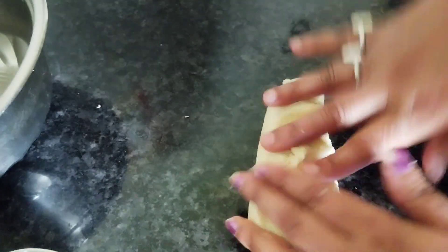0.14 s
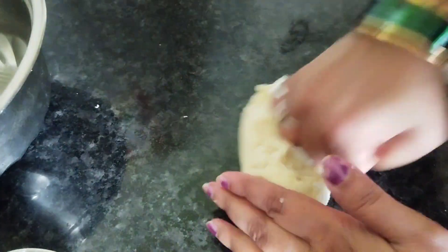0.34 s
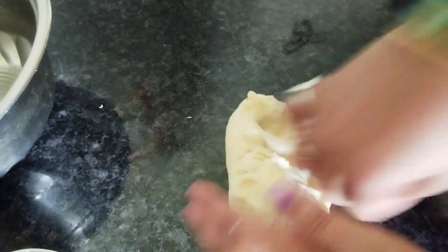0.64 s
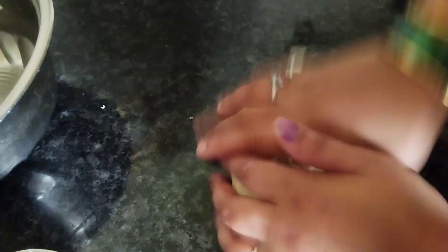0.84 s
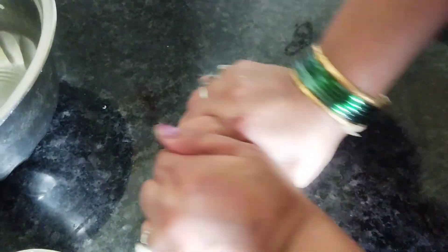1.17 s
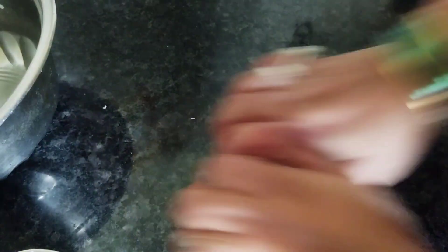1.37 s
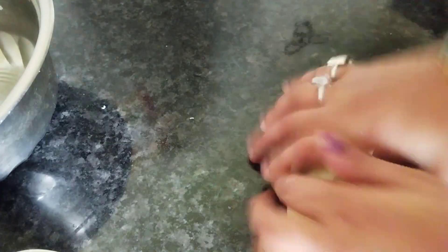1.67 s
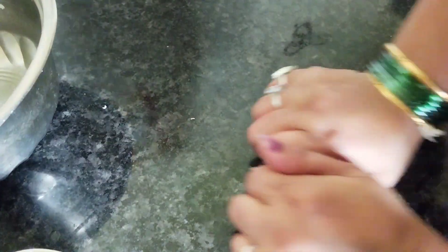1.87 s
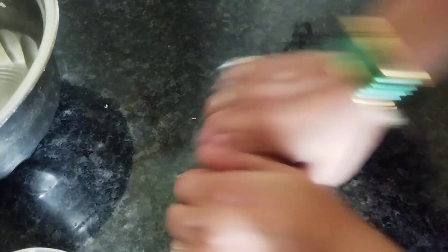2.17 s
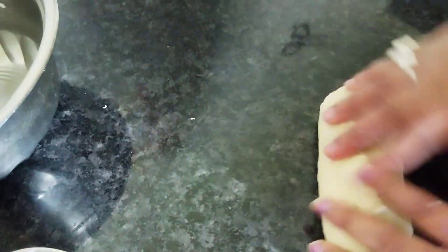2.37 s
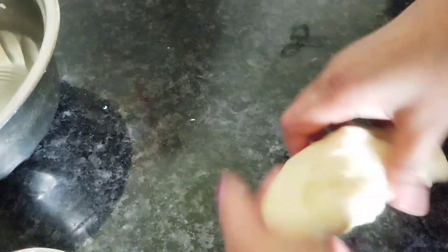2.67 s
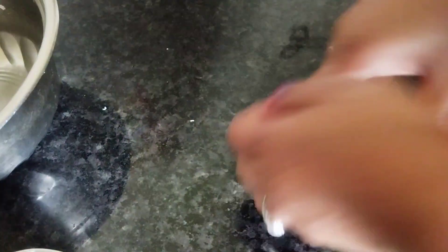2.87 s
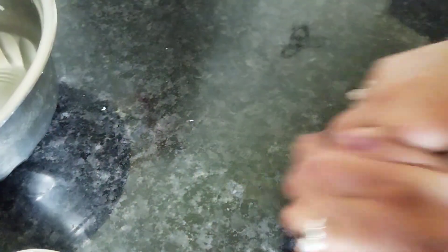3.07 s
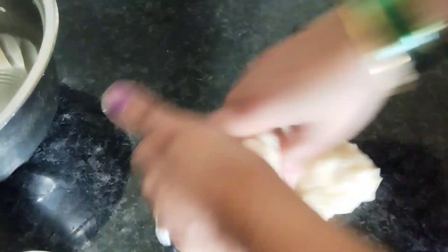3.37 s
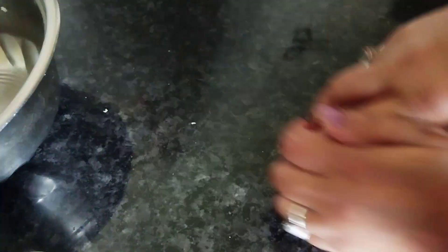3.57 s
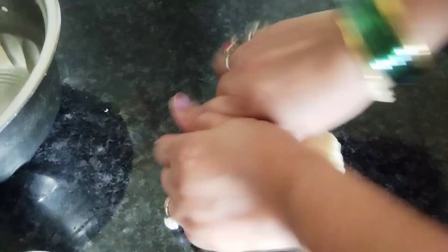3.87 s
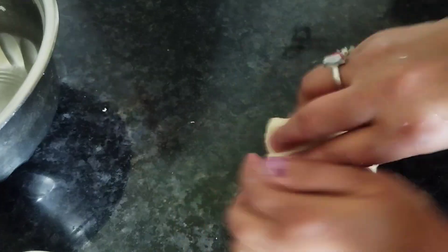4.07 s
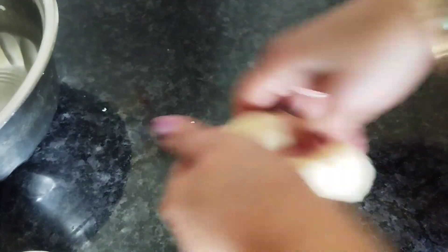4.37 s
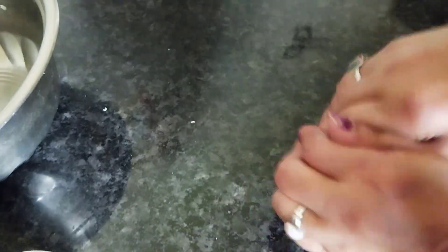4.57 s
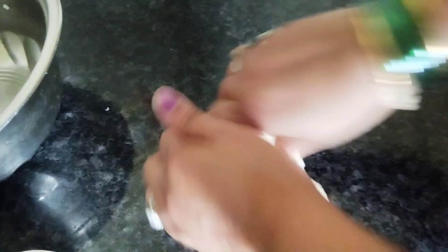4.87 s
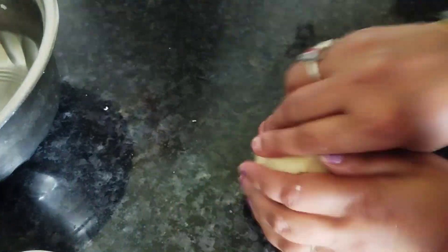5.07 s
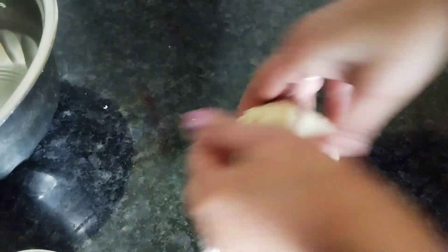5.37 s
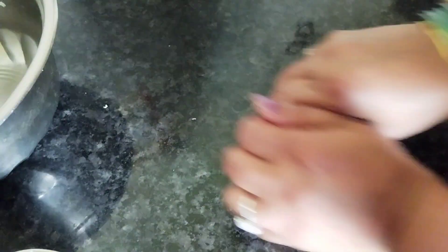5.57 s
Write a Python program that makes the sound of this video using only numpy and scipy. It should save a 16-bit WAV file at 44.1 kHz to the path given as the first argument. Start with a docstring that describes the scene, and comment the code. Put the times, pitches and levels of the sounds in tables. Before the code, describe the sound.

Thin glass bangles clink on a wrist while two hands knead stiff dough on a stone counter, heard from close by in a small kitchen. A sharp clink comes right at the start and another at about 0.7 seconds, with lighter ticks between. The thickest flurry arrives around 1.3 seconds, followed by a smaller cluster near 2.1 seconds and further sharp clinks at about 2.9 and 4.1 seconds. After that the clinks are mostly light, with one brighter click near 5.6 seconds. Each is a high, dry, quickly damped chatter of glass on glass, followed by a softer touch and a short reflection from hard walls. Underneath, the dough gives quiet rubs and dull thuds that swell and ease about twice a second, along with faint ticks of sliding bangles. A low appliance hum and a soft steady hiss run throughout.

```python
"""A small kitchen, one microphone close to two hands kneading stiff dough on a stone counter.
From the start a low appliance hum and microphone hiss lie under the rub and thud of the strokes.
With the first push, thin glass bangles clink on a wrist: a chatter of ring against ring, a dry crack
and high modes that the skin soon damps. A softer touch follows each clink, and hard walls answer.
The thickest flurry comes near 1.3 s; after about 4 s the clinks are mostly light."""
import sys
import numpy as np
from scipy import signal
from scipy.fft import rfft, irfft
from scipy.io import wavfile

SR = 44100
rng = np.random.default_rng(int(sys.argv[2]) if len(sys.argv) > 2 else 0)


def wrap_up_sound(samples):
    """Save the sound to the file named by the first command line argument, as 16-bit audio."""
    columns = np.atleast_2d(samples).T
    # keep every value between -1 and 1, then stretch to whole-number steps
    tamed = np.clip(columns, -1, 1)
    steps = np.round(tamed * 32767).astype(np.int16)
    wavfile.write(sys.argv[1], SR, steps)


N = 252714

# bangle clinks: (time [s], crack level over 10 ms [dB], chatter length [s], treble tilt [dB],
# pitch of the struck bangle [Hz], its ring over the crack [dB], low modes over the crack [dB])
CLINKS = [(0.0164, -18, 0.0086, 4.5, 7970, 3, -29), (0.2236, -39, 0.007, -5, 7940, 2.5, -27),
          (0.2495, -42.5, .004, 4, 8070, 8, -38), (0.3094, -29.5, 0.02, 4, 7860, -4, -27),
          (.358, -34.5, .013, 5, 7720, 1, -32), (.4183, -35.5, .008, 0, 7800, -2, -32),
          (0.4463, -32, 0.0079, -6, 7860, -3, -31), (0.6386, -29.5, 0.015, 2, 8350, -13, -32),
          (0.7145, -12.5, 0.0074, 3, 7724, -.5, -36), (.686, -41, 0.0035, -9, 7620, -7, -40),
          (0.905, -36, 0.0036, 4, 8070, -2, -36), (0.965, -31.5, 0.0066, -23, 7660, -3, -36),
          (1.089, -34.5, 0.0053, 3, 8100, -10, -36), (1.111, -27.5, 0.0027, -2, 7400, -7.5, -43),
          (1.244, -16, 0.01, 2, 7760, -8, -30), (1.2681, -15.5, 0.0045, 3, 8400, -9, -41),
          (1.277, -19.5, .009, 2, 8900, -8, -15), (1.29, -16, 0.0054, -2, 7880, -8, -5),
          (1.2991, -24.5, 0.0049, -12, 7670, 8, -29), (1.3073, -18, .01, 10, 7930, -3, -31),
          (1.375, -24.5, 0.0061, -1, 8690, -8, -30), (1.632, -33.5, 0.011, -15, 8440, -4, -22),
          (1.7233, -36, 0.0099, -8, 9150, -4, -21), (1.74, -35, 0.0059, -5, 8070, 5.5, -36),
          (1.826, -43, .0045, 7, 8640, 4, -19), (1.9799, -32, 0.011, -3, 7000, -2, -36),
          (2.005, -29.5, .022, 0, 7530, -4, -27), (2.0645, -14, 0.0093, 3.5, 9000, -11, -37),
          (2.1161, -21.5, 0.011, 9, 7850, -7, -27), (2.1388, -21, .005, .5, 7800, -2, -17.5),
          (2.4877, -34, 0.014, -4, 7840, 0, -36), (2.566, -31, 0.021, 3, 8400, -15, -37),
          (2.671, -42, .012, -3, 8400, -5, -35), (2.781, -28.5, 0.007, 0, 7640, -8, -43),
          (2.8741, -15, 0.0099, 1.5, 9900, -15, -16), (3.1125, -38.5, 0.0047, 0, 9060, -1, -18),
          (3.3483, -35.5, 0.0063, 1, 7700, -7, -27), (3.4533, -28.5, .003, -1, 8160, 6.5, -39),
          (3.529, -27.5, 0.0048, -4.5, 8720, -5, -17), (3.6549, -33.5, 0.0097, -2, 7740, -18, -30),
          (3.868, -32.5, 0.0018, -1, 7900, -12, -43), (3.9156, -29.5, .007, 4, 8100, 1.5, -44),
          (3.9413, -42, .002, 7, 7900, 10, -36), (3.994, -35, 0.0058, -10, 6830, -8, -23),
          (4.0619, -23, 0.01, -3, 7990, -10, -19.5), (4.067, -20, 0.0062, 9, 8170, 3, -47),
          (4.3987, -42.5, .006, 0, 8900, -1, -18), (4.534, -35.5, 0.0073, -3.5, 8020, 8, -42),
          (4.6265, -31, .004, 4, 7610, 1.5, -42), (4.9158, -33, .0033, 1, 7700, 7, -36),
          (5.04, -40.5, 0.0054, -9, 7950, 7, -26), (5.107, -35.5, 0.007, -6, 7320, -4, -19),
          (5.135, -37.5, 0.023, -8, 7050, -4, -36), (5.515, -36, 0.0045, -8, 7890, 11.5, -34),
          (5.57, -49, 0.0026, 0, 7770, 11.5, -46), (5.602, -34.5, 0.0064, -7, 8500, -14, -38),
          (5.6092, -22.5, 0.0058, 5.5, 8240, -20, -44)]


def amp(db):
    """Decibels to gain."""
    return 10 ** (np.asarray(db) / 20)


def unit(x):
    """Scales to an energy of one."""
    return x / np.sqrt(np.sum(x ** 2) + 1e-20)


def curve(points, hz):
    """Joins (frequency [Hz], value) points by straight lines on a log frequency axis."""
    f, value = np.transpose(points)
    return np.interp(np.log(hz + 1), np.log(f + 1), value)


def add(mix, s, sound):
    """Lays a sound into the mix at s seconds."""
    part = mix[max(round(s * SR), 0):][:len(sound)]
    part += sound[:len(part)]


def noise(gain):
    """Noise of rms one whose spectrum follows gain(hz)."""
    spectrum = rfft(rng.standard_normal(N)) * gain(np.fft.rfftfreq(N, 1 / SR))
    return unit(irfft(spectrum, N)) * np.sqrt(N)


def swell(t, rise_s):
    """Soft start, complete soon after the rise time."""
    return 1 - np.exp(-(t / rise_s) ** 2)


def decay(t, t60):
    """Dies away by 60 dB in t60 seconds."""
    return np.exp(-np.log(1000) * t / t60)


def room_tone(hiss_db=-45.5):
    """An appliance hums in narrow, wavering bands of noise under steady room and microphone hiss."""
    # hum bands: (centre [Hz], width [Hz], level [dB])
    hum_bands = [(64, 8.3, -69.5), (102, 6.3, -58), (162.6, 14, -63.5), (193.6, 22, -60), (243.4, 11, -69)]
    # spectrum of the hiss: (frequency [Hz], relative level [dB])
    hiss_colour = [(20, 1), (62, 6), (80, -22), (130, 2), (200, -14.5), (320, -3.5), (700, -5.5),
                   (1500, -11), (3300, -15), (4800, -14), (6500, -1.5), (8100, 1), (10200, -1.5),
                   (12000, -10.5), (13500, -17), (15800, -20)]
    hum = sum(amp(db) * noise(lambda hz: 1 / (1 + ((hz - centre) / width) ** 2) ** 2)
              for centre, width, db in hum_bands)
    return hum + amp(hiss_db) * noise(lambda hz: amp(curve(hiss_colour, hz)))


def kneading(resting_db=-69):
    """Strength of the hands' rub and push at every sample: each stroke swells and eases off."""
    # hand strokes: (time of peak [s], half length [s], rub level [dB], push level [dB])
    hand_strokes = [(0.025, 0.11, -51.5, -49), (0.347, 0.1, -58, -52), (0.743, 0.11, -55, -54.5),
                    (1.121, 0.03, -56, -54), (1.33, 0.093, -51.5, -51.5), (1.734, 0.14, -58, -54),
                    (2.02, 0.037, -53, -46.5), (2.178, 0.083, -53.5, -52.5), (2.6, 0.11, -55.5, -62),
                    (2.898, 0.06, -62, -46), (3.253, 0.11, -73, -63), (3.616, 0.15, -59.5, -57),
                    (4.043, 0.15, -55.5, -64), (4.606, .09, -59.5, -61), (4.93, 0.029, -60, -54.5),
                    (5.135, 0.07, -58.5, -59), (5.653, 0.12, -56, -65)]
    s, half, rub_db, push_db = np.transpose(hand_strokes)[:, :, None]
    arches = np.exp(-((np.arange(N) / SR - s) / half) ** 2)
    rub = amp(resting_db) + np.sum(amp(rub_db) * arches, 0)
    push = np.sum(amp(push_db) * arches, 0)
    return rub, push


def dough(rub, push):
    """Dough on stone: soft rubbing with each stroke, a dull thud under the heavier pushes."""
    # spectrum of the rubbing: (frequency [Hz], relative level [dB])
    rub_colour = [(60, 10), (150, -4), (400, 2.5), (900, -2.5), (2000, -8), (5000, -11.5), (12000, -40)]
    # spectrum of the thud: (frequency [Hz], relative level [dB])
    thud_colour = [(20, -15), (45, -7), (64, -3), (80, -8), (102, 4.5), (124, -5), (160, 1.5), (195, 2),
                   (260, -14), (600, -22), (3000, -61)]
    rubbing = rub * noise(lambda hz: amp(curve(rub_colour, hz)))
    thud = push * noise(lambda hz: amp(curve(thud_colour, hz)))
    return rubbing + thud


def chatter(length_s, contacts_per_s=830, size=2048):
    """A knock runs through the stack: a first contact, then weaker ones at random moments."""
    t = np.arange(size) / SR
    contacts = (rng.random(size) < contacts_per_s / SR) * rng.choice([-1, 1], size)
    contacts[0] = 1
    return contacts * np.exp(-(t / length_s) ** 2)


def crack(tilt_db, size=1024):
    """One contact of glass on glass: a flash of countless short modes, bright or dull by its tilt."""
    # spectrum of a glass tick as heard through a microphone that lifts 6-12 kHz:
    # (frequency [Hz], relative level [dB])
    tick_colour = [(300, -45), (1500, -33), (3200, -33), (4800, -22), (6200, -9.5), (7200, -4.5), (8200, 0),
                   (9500, -2), (11300, -7), (12600, -11.5), (13800, -23), (15800, -18.5)]
    hz = np.abs(np.fft.fftfreq(size, 1 / SR))
    t = np.arange(size) / SR
    tilt_share = np.interp(hz, [2000, 3800, 5500, 8000, 14000], [0, -.7, -.5, 0, .8])
    log_gain = np.log(amp(curve(tick_colour, hz) + tilt_db * tilt_share))
    response = np.fft.ifft(np.exp(np.conj(signal.hilbert(log_gain)))).real  # minimum phase
    flash = rng.standard_normal(size) * swell(t, rise_s=0.0028) * decay(t, t60=0.015)
    return signal.fftconvolve(flash, response)


def ring(modes):
    """Glass modes as dying sines; no two bangles are quite the same size or struck at the same spot."""
    t = np.arange(SR // 6) / SR
    hz, db, t60 = np.transpose(modes)[:, :, None]
    size, spot, phase = rng.standard_normal((3, len(modes), 1))
    waves = swell(t, rise_s=0.0005) * np.sin(2 * np.pi * (hz * (1 + 0.0062 * size) * t + phase))
    return np.sum(amp(db + 2 * spot) * decay(t, t60) * waves, 0)


def struck(contacts, response, db):
    """The glass answers every contact of a chatter; the level is counted over 10 ms."""
    return amp(db) * np.sqrt(SR / 100) * unit(signal.fftconvolve(contacts, response))


def clinks(rows, damped_t60=0.011, free_t60=0.08):
    """Each chatter drives a crack, the struck bangle with its two neighbours, and the stack's modes."""
    # bending modes of bangles swinging free of the skin: (frequency [Hz], relative level [dB], t60 [s])
    low_modes = [(3957, -5, .03), (4000, 6.5, 0.03), (4270, 7, 0.011), (3940, -25.5, 0.2),
                 (3990, -25, 0.22), (4240, -25, 0.15), (4270, -34, .22)]
    # upper modes, reached by hard contacts: (frequency [Hz], relative level [dB], t60 [s])
    high_modes = [(8870, -0.5, 0.017), (10100, 12, .012), (10650, 17, 0.014), (11270, 11.5, 0.076),
                  (11700, -11, .012), (13700, -3, .025), (15050, -17, .02)]
    out = np.zeros(N)
    for s, db, length_s, tilt_db, hz, ring_db, low_db in rows:
        contacts = chatter(length_s)
        high_db = -14 - 0.52 * ring_db  # a glancing blow gives the upper modes what the main ring loses
        on_skin = [(hz, 0, damped_t60), (hz + 350, -6, damped_t60), (hz - 300, -7, damped_t60)]
        lingering = [(hz, -24, free_t60)]
        parts = [(0, crack(tilt_db)), (ring_db, ring(on_skin + lingering)),
                 (low_db, ring(low_modes)), (high_db, ring(high_modes))]
        for part_db, response in parts:
            add(out, s, struck(contacts, response, db + part_db))
    return out


def sliding(rub, over_rub_db=8, layers=6, ticks_per_s=40):
    """Faint stray ticks of bangles sliding on each other as the wrist moves."""
    out = np.zeros(N)
    for _ in range(layers):
        ticks = rng.random(N) < ticks_per_s / SR
        strength = amp(4.9 * np.minimum(rng.exponential(1, N), 2))
        out += signal.oaconvolve(ticks * strength, crack(tilt_db=-2))[:N]
    return amp(over_rub_db) * unit(out) * np.sqrt(N) * rub


def settling(db=-47, length_s=0.004, tilt_db=-5, ring_db=-8, low_db=-32):
    """After each clink the stack falls back with a soft second touch of some bangle."""
    times = np.array(CLINKS)[:, 0] + rng.uniform(0.016, 0.036, len(CLINKS))
    pitches = rng.uniform(7330, 8330, len(CLINKS))
    return clinks([(s, db, length_s, tilt_db, hz, ring_db, low_db) for s, hz in zip(times, pitches)])


def knocks():
    """Hard blows shake the whole stack in its deepest modes."""
    # hard blows: (time [s], level over 10 ms [dB])
    blows = [(0.713, -52), (1.245, -55), (1.269, -50), (1.296, -39), (2.065, -50), (2.137, -48)]
    # deepest modes of the stack: (frequency [Hz], relative level [dB], t60 [s])
    deep_modes = [(1270, 2, 0.016), (1380, -3.5, 0.032), (1950, -24, 0.0064), (2115, 2.5, 0.029),
                  (2580, 8, 0.006), (3200, 0, 0.002)]
    out = np.zeros(N)
    for s, db in blows:
        add(out, s, struck(chatter(length_s=0.025), ring(deep_modes), db))
    return out


def kitchen(sound):
    """Dense reflections from hard, near walls build up quickly and die sooner in the treble."""
    # reverberation time of the room: (frequency [Hz], t60 [s])
    room_t60 = [(300, 0.68), (4000, 0.36), (6000, 0.34), (8000, 0.26), (12000, 0.24), (16000, 0.31)]
    hz, t, bands = signal.stft(rng.standard_normal(SR // 2), SR, nperseg=256)
    tail = signal.istft(bands * decay(t, curve(room_t60, hz)[:, None]), SR)[1]
    tail *= swell(np.arange(len(tail)) / SR, rise_s=0.00067)
    return signal.fftconvolve(sound, unit(tail))[:N]


def scene(walls=3, room_db=-4):
    """Each wall is sent its own blend of the bangles' modes; one close microphone feeds both channels."""
    rub, push = kneading()
    faint = settling() + sliding(rub)
    towards_walls = [clinks(CLINKS) + knocks() + faint for _ in range(walls)]
    direct = towards_walls[0]
    reflections = sum(kitchen(sound) for sound in towards_walls) / np.sqrt(walls)
    mono = direct + amp(room_db) * reflections + dough(rub, push) + room_tone()
    return np.array([mono, mono])


def record(dry, ceiling=0.92, edge_hz=15900):
    """The recorder clips any peak just under full scale, then cuts the highest treble."""
    clipped = np.clip(dry, -ceiling, ceiling)
    low_pass = signal.firwin(401, edge_hz, window=("kaiser", 8), fs=SR)
    return signal.oaconvolve(clipped, low_pass[None], "same")


dry = scene()
out = record(dry)
wrap_up_sound(out)
```